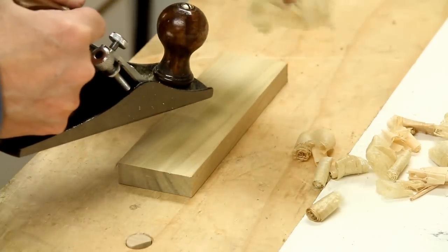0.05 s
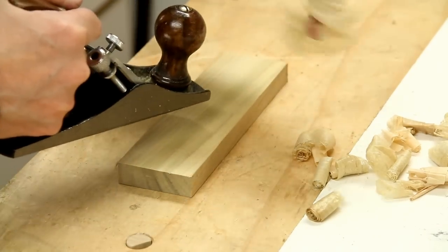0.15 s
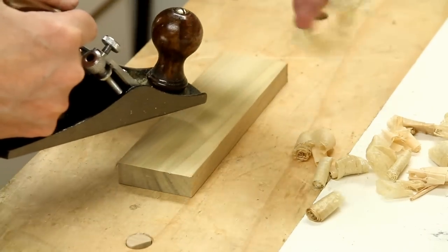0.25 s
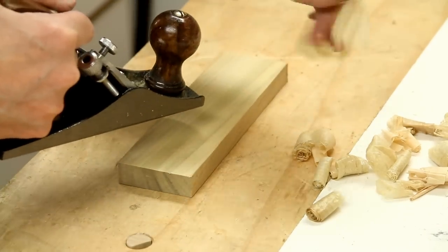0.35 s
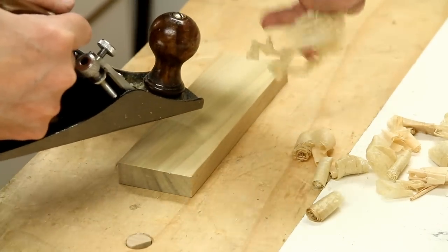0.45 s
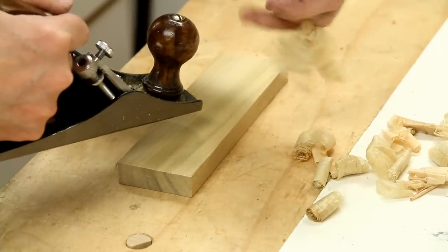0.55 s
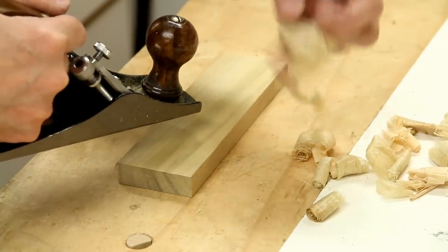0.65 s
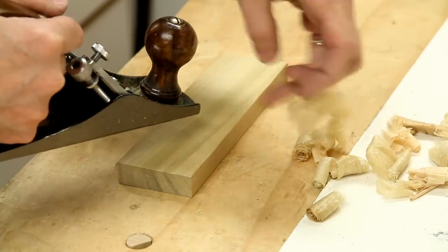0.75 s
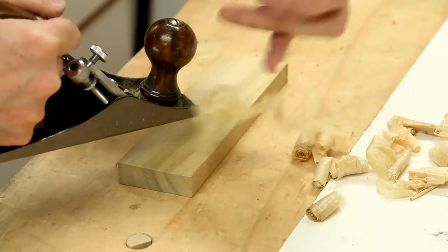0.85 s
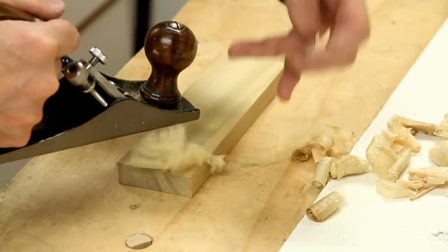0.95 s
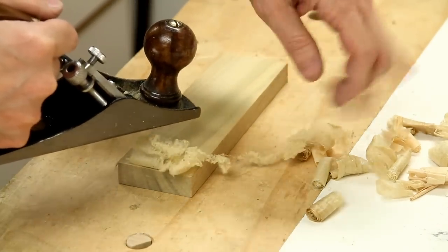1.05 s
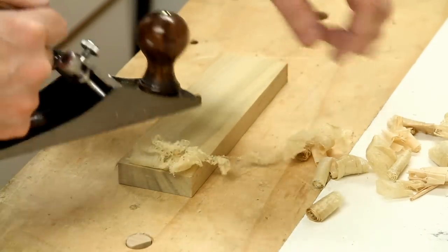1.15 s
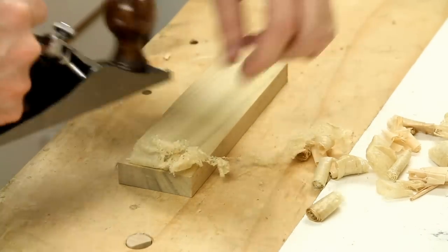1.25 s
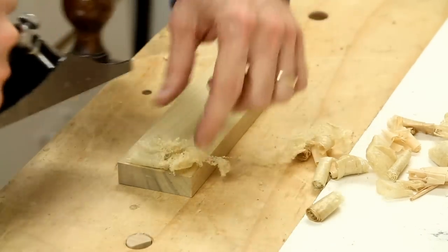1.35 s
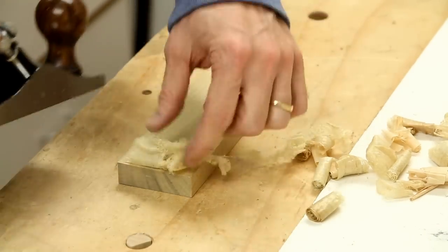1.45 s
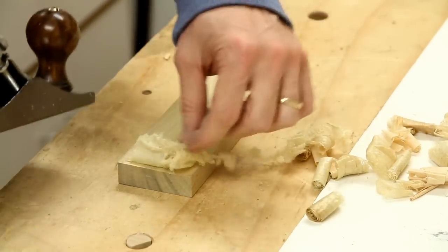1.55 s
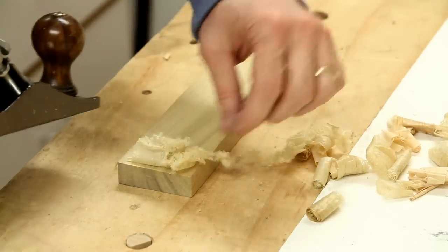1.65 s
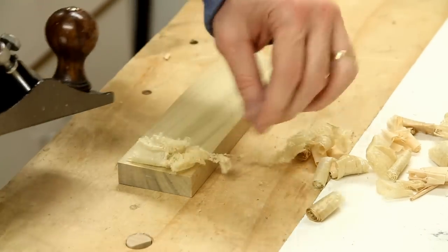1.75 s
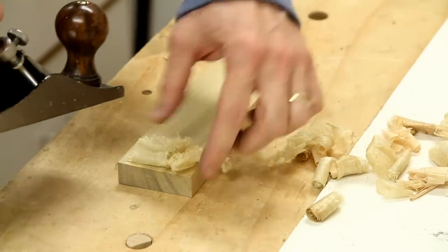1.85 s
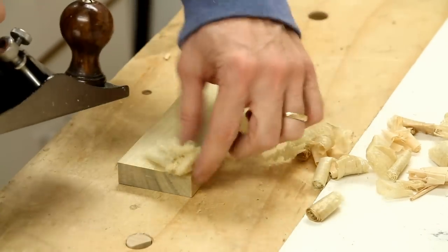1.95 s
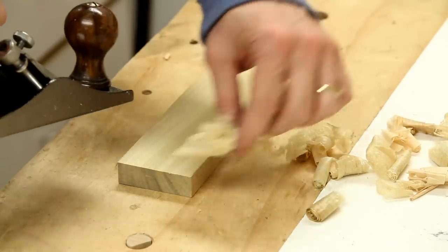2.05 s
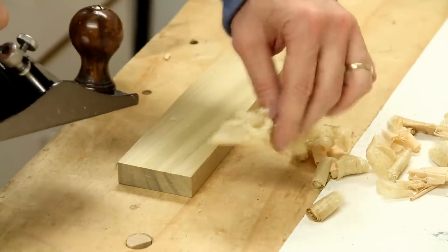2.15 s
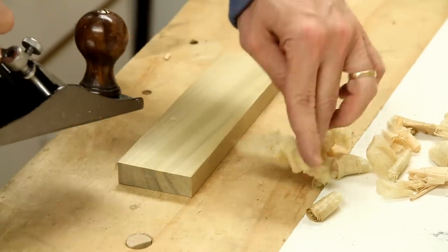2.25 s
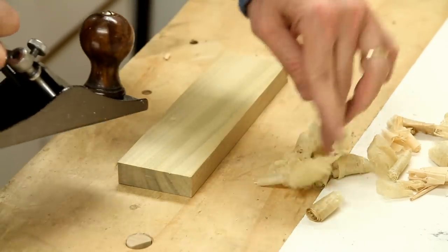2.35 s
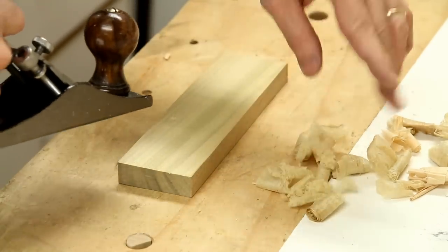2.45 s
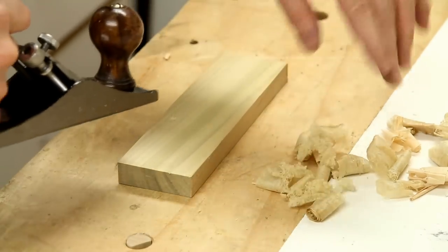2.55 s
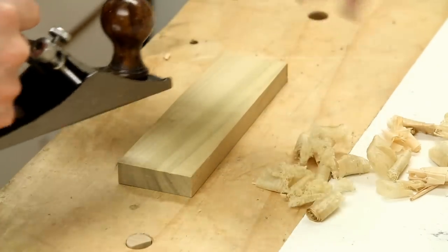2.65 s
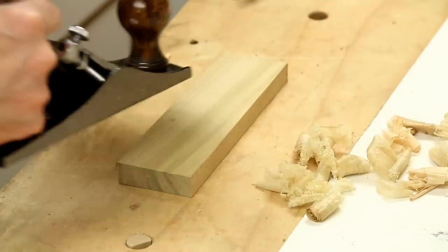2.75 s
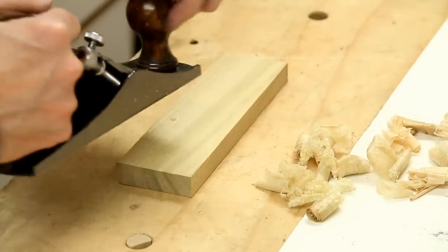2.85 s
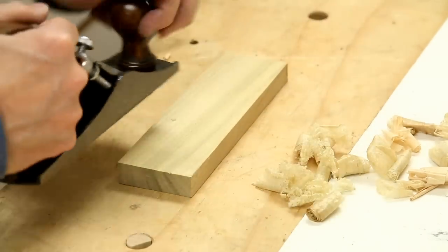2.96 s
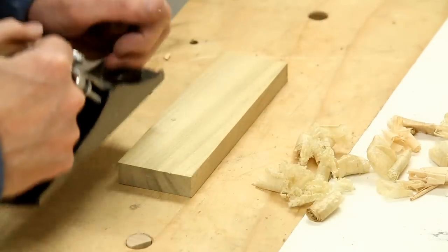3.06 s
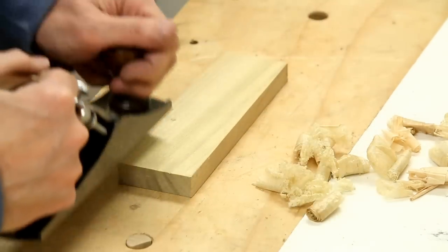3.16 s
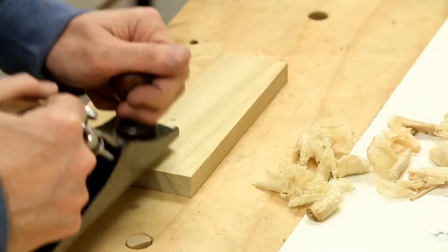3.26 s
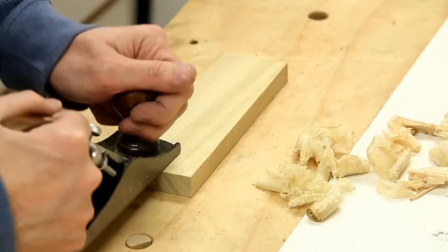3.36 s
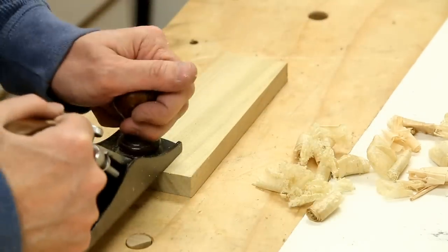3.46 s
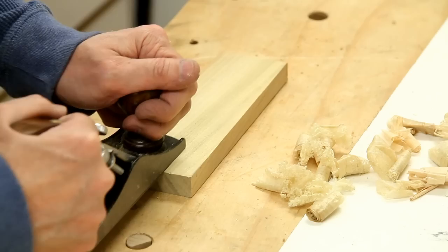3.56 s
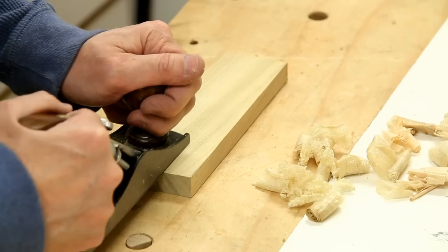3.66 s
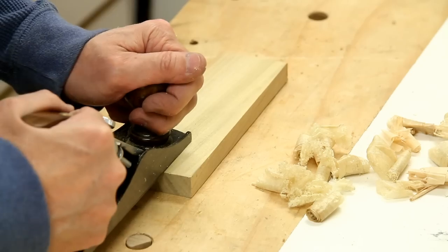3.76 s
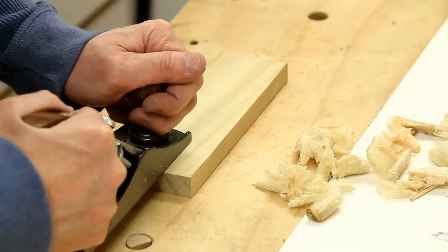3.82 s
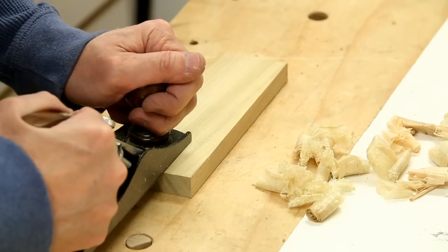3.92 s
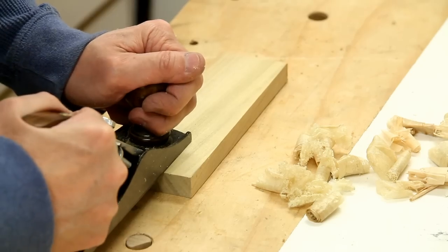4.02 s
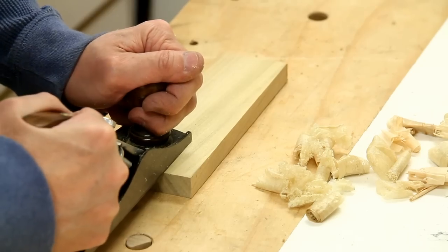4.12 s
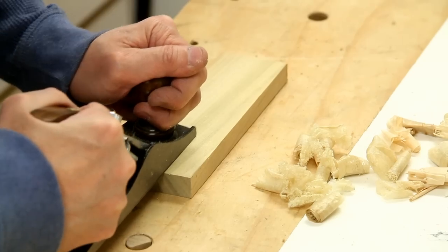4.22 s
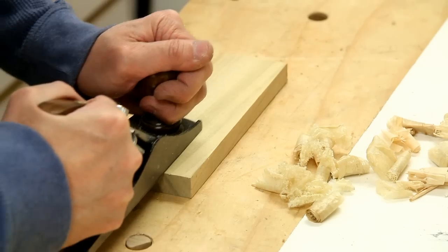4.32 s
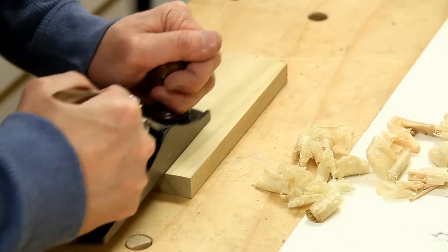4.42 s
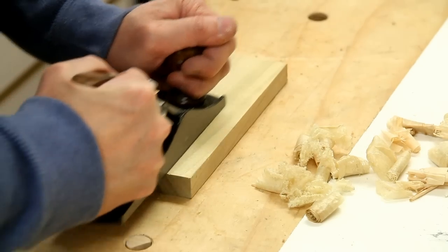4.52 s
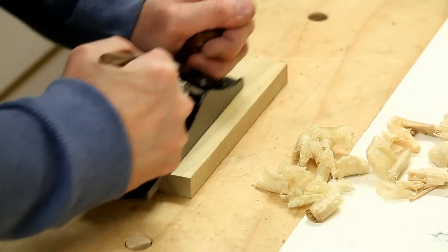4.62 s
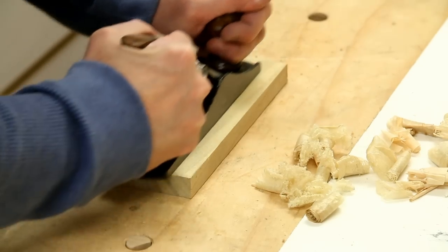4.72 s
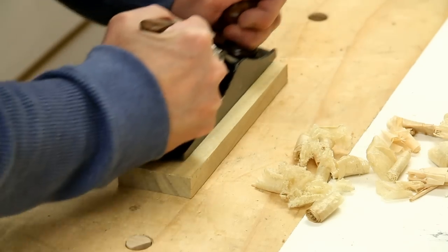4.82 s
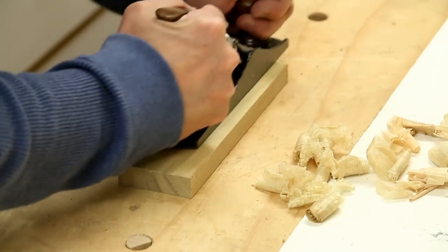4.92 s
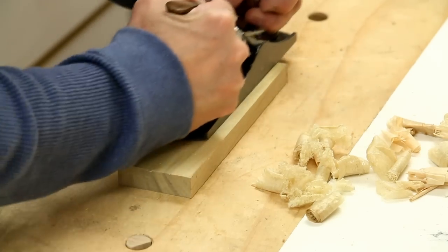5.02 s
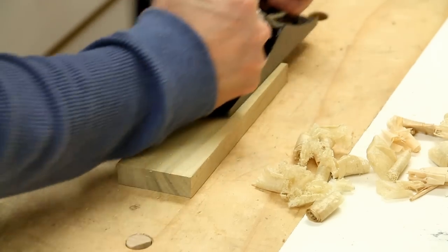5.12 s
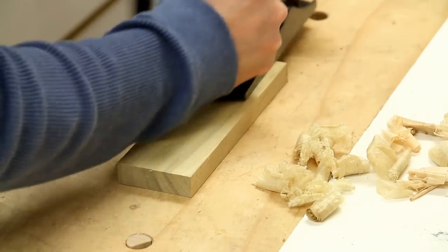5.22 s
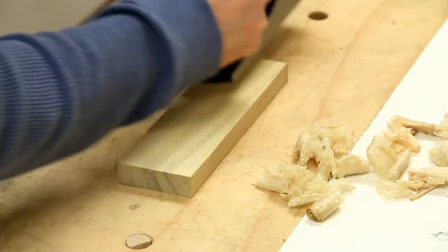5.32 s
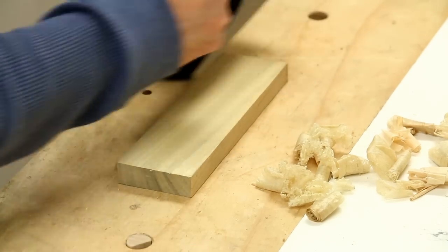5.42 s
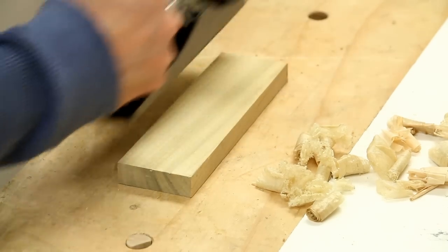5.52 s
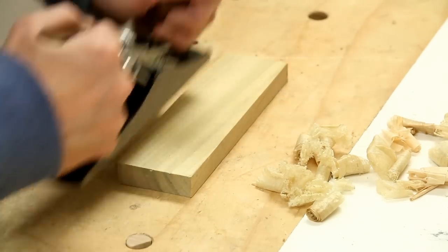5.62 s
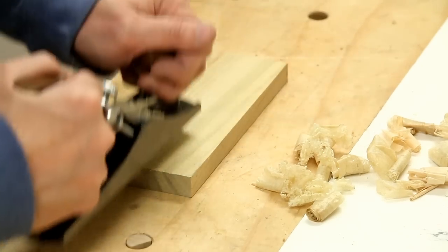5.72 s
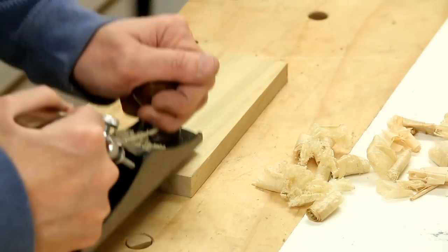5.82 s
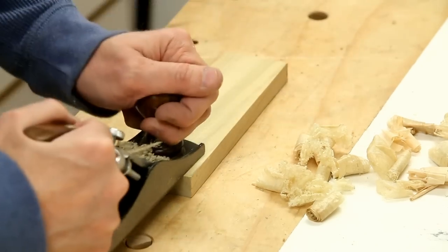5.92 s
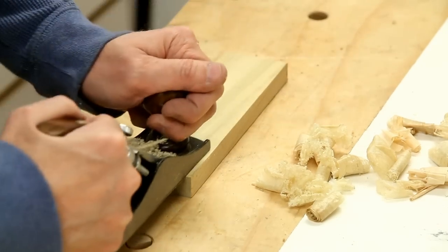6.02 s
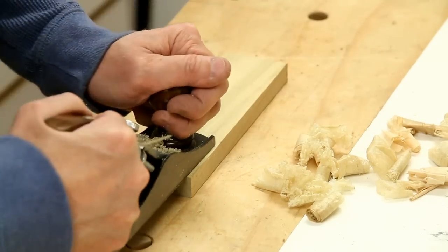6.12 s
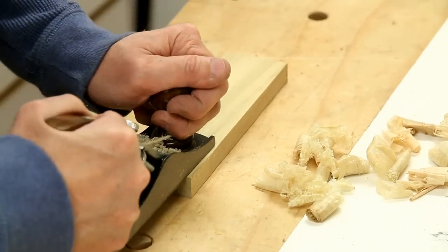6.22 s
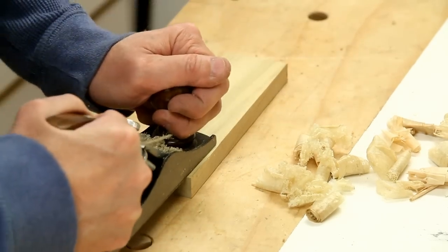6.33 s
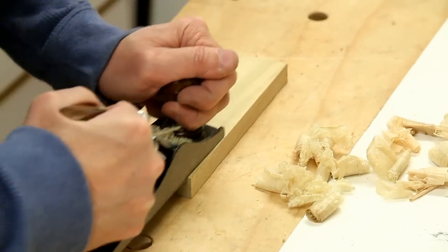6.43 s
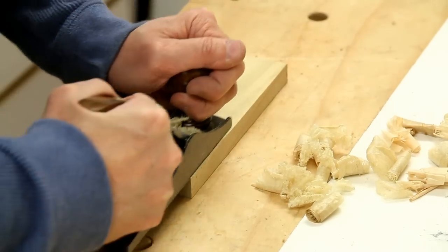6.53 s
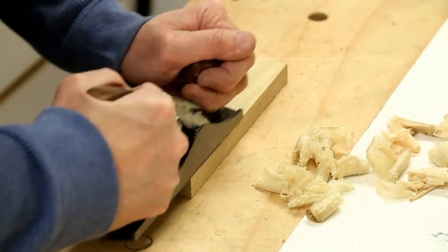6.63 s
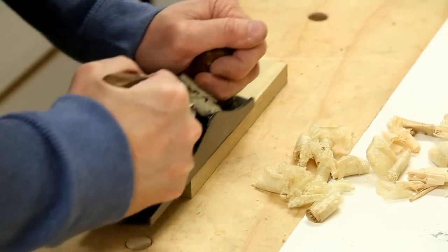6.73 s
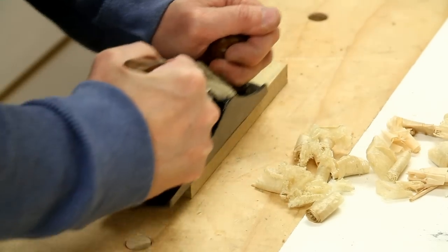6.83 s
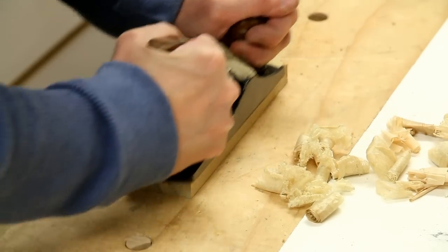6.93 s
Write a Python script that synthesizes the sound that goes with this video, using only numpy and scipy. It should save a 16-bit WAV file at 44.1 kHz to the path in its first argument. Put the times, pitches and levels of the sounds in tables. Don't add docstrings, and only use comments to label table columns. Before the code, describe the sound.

In a quiet workshop, faint shavings rustle, then a hand plane lands on wood and makes two stuttering, clicking, rasping strokes along a small board.

```python
import sys
import numpy as np
from scipy import signal
from scipy.fft import rfft, irfft
from scipy.io import wavfile
from scipy.ndimage import uniform_filter1d

SR = 44100
rng = np.random.default_rng(int(sys.argv[2]) if len(sys.argv) > 2 else 0)


def nominal_scale(level):
    x = np.asarray(level, float) / 20
    return 10 ** x


def log_audio(samples):
    frames = np.atleast_2d(samples).T
    limited = np.clip(frames, -1, 1)
    pcm = np.round(limited * 32767).astype(np.int16)
    wavfile.write(sys.argv[1], SR, pcm)


N = 307818
T = np.arange(N) / SR

# start_s [s], body_peak_db [dB],
# board_minus_body_db [dB]
GRAIN_SLIPS = [(3.6633, -31, -1), (3.7815, -25.5, -2), (3.8058, -29.5, 2.5), (3.8803, -20.5, -11.5),
               (3.9259, -18, -9), (3.9517, -21.5, -15), (3.991, -19, -9), (4.0167, -18, -11),
               (4.042, -22.5, -12), (4.055, -16.5, -6), (4.0787, -20, -7), (4.1132, -15, -12),
               (4.1328, -27, -2.5), (4.2002, -10, -7.5), (4.2267, -14.5, -15), (4.2903, -14, -7),
               (4.3097, -24.5, 4), (4.369, -13, -13.5), (4.4277, -15, -12), (4.4494, -21.5, -9),
               (4.4902, -18.5, -23), (4.5371, -13, -8), (4.5487, -17.5, -16), (4.7287, -20.5, 4),
               (5.0953, -36, -16), (5.262, -22.5, -2), (5.3073, -35, -2),
               (6.252, -42.5, 6), (6.2716, -38, 5), (6.2918, -26, -4), (6.3308, -25.5, -4),
                (6.359, -16.5, -10.5), (6.3809, -18.5, -5), (6.412, -22.5, -19), (6.452, -16, -13),
                (6.4742, -18, -5), (6.5116, -17, -4), (6.5328, -15.5, -3.5), (6.555, -13.5, -10),
                (6.6061, -12, -5), (6.6294, -34, 3), (6.7025, -14.5, -3.5), (6.78, -31, 7),
                (6.861, -13.5, -9.5), (6.8843, -38, -12)]
SLIPS = np.array(GRAIN_SLIPS)


def level(x, db):
    return x * nominal_scale(db) / np.sqrt(np.mean(x ** 2))


def noise():
    return rng.standard_normal(N)


def band(x, hz, width_hz):
    return signal.lfilter(*signal.iirpeak(hz, max(hz / width_hz, 0.3), SR), x)


def walk(rate_hz):
    hold = int(SR / rate_hz)
    steps = np.repeat(rng.standard_normal(N // hold + 1), hold)
    return 0.89 * uniform_filter1d(steps, hold)[:N]


def add(out, start_s, sound):
    i = int(start_s * SR)
    out[i:i + len(sound)] += sound[:N - i]


def ring(hz, t60_s, length_s):
    t = T[:int(length_s * SR)]
    return np.sin(2 * np.pi * hz * t) * np.exp(-np.log(1000) * t / t60_s)


def strike(modes, scatter_db, soft_s):
    shares_db = scatter_db * rng.standard_normal(len(modes))
    length_s = max(t60_s for *_, t60_s in modes)
    sound = sum(nominal_scale(db + share_db) * ring(hz, t60_s, length_s)
                for (hz, db, t60_s), share_db in zip(modes, shares_db))
    return sound * (1 - np.exp(-T[:len(sound)] / soft_s))


def cutting():
    # pitch_hz [Hz], width_hz [Hz], creeping_db [dB], full_speed_db [dB]
    board = [(45, 77, -18, 0), (152.5, 33, -3.5, 0.5), (235, 41, -4.5, -4), (312, 57, -0.5, -0.5),
             (400, 69, -5, 5.5), (500, 131, -5.5, 3.5), (633, 136, -6.5, 2.5), (807, 104, -5.5, 0.5),
             (1003, 45, -5.5, -3), (1140, 200, -15, -14.5)]
    body = [(1300, 196, -0.5, -7), (1646, 140, 0, -6), (1950, 360, -8, -9), (2200, 135, 3.5, 0.5),
            (2540, 206, -4, -3), (2640, 110, 0.5, 2.5), (3190, 470, -10, -7), (3443, 113, -5, 6.5),
            (3840, 1570, -17.5, -6.5)]
    blade = [(4680, 67, -0.5, -12), (4950, 210, -1, -13), (5400, 83, -5, -0.5), (5546, 100, -14.5, -2.5),
             (5860, 130, -7.5, -2.5), (6200, 72, -7, 4), (6420, 250, -9.5, -4)]
    edge = [(7000, 160, 0, -3), (7140, 430, -6, -9), (8330, 340, 8.5, 2), (9380, 340, 1, -1.5),
            (10200, 300, 1.5, 1.5), (11090, 330, -8, -3), (11200, 170, -6, 0.5), (13350, 200, -18, -5),
            (14300, 600, -12, -15), (14850, 350, -12, -2), (15700, 350, -20, -5), (9000, 5900, -15, -16)]
    # start_s [s], pressure_db [dB], speed [0-1]
    hands = [
        [(3.48, -38.5, 0), (3.6, -51, 0.38), (3.86, -51.5, 0.14), (3.93, -42.5, 0.22), (4.15, -39.5, 0.22),
         (4.46, -33, 0.13), (4.7, -39.5, 0.99), (4.97, -37.5, 0.92), (5.128, -43, 0.77)],
        [(5.129, -35, 0.34), (5.18, -42, 0.54), (5.3, -51, 0.3), (5.37, -60, 0), (5.5, -60, 0.1)],
        [(6.065, -44.5, 0.16), (6.2, -47, 0), (6.37, -48, 0.32), (6.44, -34.5, 0.3), (6.54, -32, 0),
         (6.57, -38, 0.35), (6.7, -35, 0.32), (6.82, -38.5, 0.61), (6.98, -39.5, 0.87)],
    ]
    # over_pressure_db [dB], more_in_the_bite_db [dB], dig_s [s], more_at_full_speed_db [dB]
    parts = [
        (1.86, -0.5, 0.05, -0.9),
        (-5.5, 11, 0.2, 6),
        (-20.5, 11.5, 0.022, 22.5),
        (-21, 14.5, 0.027, 12.5),
    ]

    pressure = sum(nominal_scale(np.interp(T, *np.transpose(move)[:2], -120, -120)) for move in hands)
    speed = np.interp(T, *np.vstack(hands).T[[0, 2]])
    force = [pressure * nominal_scale(db + bite_db * bite(dig_s) + fast_db * speed)
             for db, bite_db, dig_s, fast_db in parts]

    jam_s, jam_length_s, jam_db = 5.02, 0.063, (1.5, 0.5, -2, -7)
    jam = np.exp(-(2 * (T - jam_s) / jam_length_s) ** 4)
    force = [push * nominal_scale(db * jam) for push, db in zip(force, jam_db)]

    start_s, body_db, board_db = np.transpose(SLIPS)
    blade_db = -35.5 + (body_db - np.median(body_db)) - 7 * np.interp(start_s, T, bite(0.01))
    force[0] += slips(body_db + board_db - 2, rise_s=0.005, snap_s=0.01, tail_s=0.032, tail_db=-12)
    force[1] += slips(body_db - 11, rise_s=0.0059, snap_s=0.0036, tail_s=0.025, tail_db=-9)
    force[2] += slips(blade_db - 10.5, rise_s=0.0013, snap_s=0.0035, tail_s=0.036, tail_db=-31)
    force[3] += slips(blade_db - 12, rise_s=0.0017, snap_s=0.0036, tail_s=0.028, tail_db=-29)

    tears = fibres(2.27, 2.67, 40), fibres(2.74, 1.18, 60), fibres(2.2, 1.0, 50), fibres(1.2, 0.28, 45)
    return sum(push * bank(tear, modes, speed)
               for push, tear, modes in zip(force, tears, (board, body, blade, edge)))


def bite(dig_s):
    # start_s [s], end_s [s]
    cuts = [
        (4.197, 5.128),
        (6.43, 7.1),
    ]
    return sum((T > start_s) * (T < end_s) * (1 - np.exp(-np.maximum(T - start_s, 0) / dig_s))
               for start_s, end_s in cuts)


def fibres(scatter_db, flicker_db, rate_hz):
    snaps_db = scatter_db * np.minimum(rng.exponential(size=N), 7)
    return level(noise() * nominal_scale(snaps_db + flicker_db * walk(rate_hz)), 0)


def slips(db, rise_s, snap_s, tail_s, tail_db):
    out, t = np.zeros(N), T[:SR // 8]
    fall = np.exp(-t / snap_s) + nominal_scale(tail_db) * np.exp(-t / tail_s)
    shape = (1 - np.exp(-t / rise_s)) * fall
    for start_s, size in zip(SLIPS[:, 0], nominal_scale(db)):
        add(out, start_s - 0.001, size * shape)
    return out


def bank(x, modes, speed):
    out, power = 0, 0
    for k, (hz, width_hz, slow_db, fast_db) in enumerate(modes):
        gain = nominal_scale(slow_db + (fast_db - slow_db) * speed)
        swell = nominal_scale(1.74 * walk(12))
        out = out + (-1) ** k * gain * swell * band(x, hz, width_hz)
        power = power + gain ** 2 * np.pi * width_hz / SR
    return out / np.sqrt(power)


def chatter():
    # pitch_hz [Hz], level_db [dB], t60_s [s]
    loose_parts = [(600, -5, 0.021), (1080, -2.5, 0.013), (1400, -8, 0.014), (1652, -2.5, 0.014),
                   (1860, 3.5, 0.012), (2035, -4.5, 0.011), (2110, -3, 0.01), (2380, -11, 0.0063)]
    out = np.zeros(N)
    for start_s, db, _ in SLIPS:
        for late_s, loss_db in ((0, 6.9), (0.002, 6.8), (0.0045, 9.5)):
            knock_s = start_s + late_s * (0.696 + 0.6 * rng.random())
            add(out, knock_s, nominal_scale(db - loss_db) * strike(loose_parts, 3.5, soft_s=0.00042))
    return out


def landings():
    # pitch_hz [Hz], level_db [dB], t60_s [s]
    toe = [(126, -17, 0.093), (350, -15, 0.052), (864, -7.5, 0.016), (1850, -14, 0.0074),
           (1920, 4.5, 0.014), (2170, -1, 0.009), (2320, -1, 0.014), (3340, -1, 0.0075),
           (3890, -5.5, 0.011), (4500, -3, 0.0089), (5000, -1.5, 0.0087), (5350, -16, .01),
           (6700, -12.5, 0.01), (8500, -15, .008), (10600, -37, 0.0049)]
    flat = [(111, -24, 0.071), (197, -11, 0.027), (299, 6, 0.011), (522, -11, 0.029), (700, -4, .025),
            (750, -6.5, 0.036), (1175, -1, 0.0085), (1720, -10, 0.013), (2110, -7, 0.013),
            (2450, -7.5, 0.012), (2620, -8, 0.012), (3220, -21, .008), (4000, -14, 0.013),
            (4600, -23, .006)]
    # start_s [s], level_db [dB]
    toe_hits = [
        (3.4422, -11.5),
        (3.4445, -36),
        (3.453, -33),
        (3.458, -38),
    ]
    flat_hits = [
        (6.0071, -15.5),
        (6.0086, -11),
        (6.0165, -23),
        (6.022, -21),
        (6.026, -19.5),
        (6.046, -33),
        (6.056, -27),
    ]
    out, t = np.zeros(N), T[:SR // 2]
    rattle_shape = np.exp(-t / 0.0081) + 0.089 * np.exp(-t / 0.02)
    for hits, modes, soft_s, rattle_hz, rattle_db in ((toe_hits, toe, 0.00015, 2100, -27),
                                                      (flat_hits, flat, 0.0002, 800, -25)):
        for k, (start_s, db) in enumerate(hits):
            blow = strike(modes, 1 + 0.67 * k, soft_s * (1 + 0.8 * k))
            add(out, start_s, -(-1) ** k * nominal_scale(db) * blow)
        rattle = band(band(noise(), rattle_hz, 1.9 * rattle_hz), rattle_hz, 2.1 * rattle_hz)
        add(out, hits[0][0], level(rattle, rattle_db)[:len(t)] * rattle_shape)
    return out


def bench():
    # start_s [s], level_db [dB], pitch_hz [Hz], t60_s [s]
    thumps = [(2.87, -40, 60, 0.18), (3.052, -15, 102, 0.04), (4.725, -14, 740, 0.015),
              (5.127, -21.5, 440, 0.034), (5.139, -21, 405, 0.038), (5.243, -29, 424, 0.033),
              (5.262, -24.5, 835, 0.057), (5.305, -27.5, 552, 0.055), (5.616, -25, 500, 0.007),
              (5.843, -30.5, 104, 0.084), (5.891, -27, 79.4, 0.087), (6.399, -25.5, 69.5, 0.091),
              (6.705, -21, 910, 0.042), (6.865, -21, 563, 0.037)]
    # start_s [s], rumble_db [dB]
    drag = [
        (3.081, -46),
        (3.094, -47),
        (3.132, -49),
        (3.156, -37),
        (3.354, -36),
        (3.398, -51.5),
        (3.44, -44),
    ]
    out = np.zeros(N)
    for start_s, db, hz, t60_s in thumps:
        knock = ring(hz, t60_s, t60_s) + 1.04 * ring(1.43 * hz, 0.3 * t60_s, t60_s)
        soft_start = np.minimum(T[:len(knock)] * hz * 1.5, 1)
        add(out, start_s, nominal_scale(db) * knock * soft_start)
    rumble = level(band(band(noise(), 89, 80), 89, 140), 0)
    return out + rumble * nominal_scale(np.interp(T, *np.transpose(drag), -120, -120))


def rustles():
    # centre_s [s], length_s [s], level_db [dB], pitch_hz [Hz], width_hz [Hz]
    puffs = [(0.668, 0.058, -56.5, 12000, 9000), (1.199, 0.0074, -55, 2500, 2500),
             (1.324, 0.081, -58, 2500, 4000), (1.574, 0.073, -62, 4500, 4000),
             (2.042, 0.089, -52, 5000, 5000), (2.053, 0.07, -60, 1400, 2000), (2.227, .06, -59, 7000, 7000),
             (2.9, 0.079, -53.5, 2430, 3000), (2.96, 0.054, -54, 3480, 4000),
             (3.09, 0.062, -56.5, 6200, 3000), (3.187, 0.32, -56, 4000, 4000),
             (3.31, 0.23, -55.5, 5600, 5000), (3.29, 0.24, -50.5, 2200, 2500),
             (3.307, 0.31, -47.5, 350, 400), (5.208, 0.19, -45.5, 5000, 6900),
             (5.264, 0.027, -32, 600, 700), (5.301, 0.059, -38, 600, 700), (5.354, 0.096, -46.5, 500, 600),
             (5.617, 0.0026, -43, 2470, 5000), (6.185, 0.062, -54, 4500, 5000)]
    crackle, out = fibres(2.9, 2.4, 60), np.zeros(N)
    for centre_s, length_s, db, hz, width_hz in puffs:
        other_fibres = np.roll(crackle, rng.integers(N))
        puff = band(band(other_fibres, hz, width_hz), hz, 2.4 * width_hz)
        out += level(puff, db) * np.exp(-(2 * (T - centre_s) / length_s) ** 2)
    return out


def room(x):
    t60_s, tail_db, centre_hz, width_hz = 0.32, -14, 1000, 3000
    t = T[:SR // 2]
    tail = band(rng.standard_normal(len(t)), centre_hz, width_hz)
    tail = tail * np.exp(-np.log(1000) * t / t60_s) * (t > 0.006)
    return signal.fftconvolve(x, tail * nominal_scale(tail_db) / np.sqrt(np.sum(tail ** 2)))[:N]


def air():
    # pitch_hz [Hz], density_db [dB per Hz]
    rumble_colour = [(12, -21), (20, 3.5), (53, -2.5), (126, -4), (290, -11), (326, 2.5), (359, -11),
                     (424, -12), (539, -12), (579, -13.5), (6000, -31), (7800, -32), (13200, -120)]
    # pitch_hz [Hz], width_hz [Hz], level_db [dB rms]
    fan = [(119, 13, -65), (239, 17, -68), (335.4, 9.3, -67.5), (541, 30, -66.5)]
    hz, db = np.transpose(rumble_colour)
    colour_db = np.interp(np.log(np.fft.rfftfreq(N, 1 / SR) + 1), np.log(hz), db, right=-90)
    rumble = level(irfft(rfft(noise()) * nominal_scale(colour_db), N), -52.5) * nominal_scale(0.5 * walk(1.37))
    hum = sum(level(band(noise(), pitch_hz, width_hz), hum_db) for pitch_hz, width_hz, hum_db in fan)
    return rumble + hum


def scene():
    near = cutting() + chatter() + landings() + bench() + rustles()
    return np.tile(near + room(near) + air(), (2, 1))


def band_limit(x):
    return signal.sosfilt(signal.butter(12, 16970, fs=SR, output="sos"), x)


def record(dry):
    hiss = np.array([level(noise(), -54.5) + level(band(noise(), 40, 130), -87) for _ in dry])
    top_hz = 15720
    low_pass = signal.ellip(12, 0.2, 80, top_hz, fs=SR, output="sos")
    mix = signal.sosfilt(low_pass, dry + hiss)
    return band_limit(mix)


dry = scene()
out = record(dry)
log_audio(out)
```